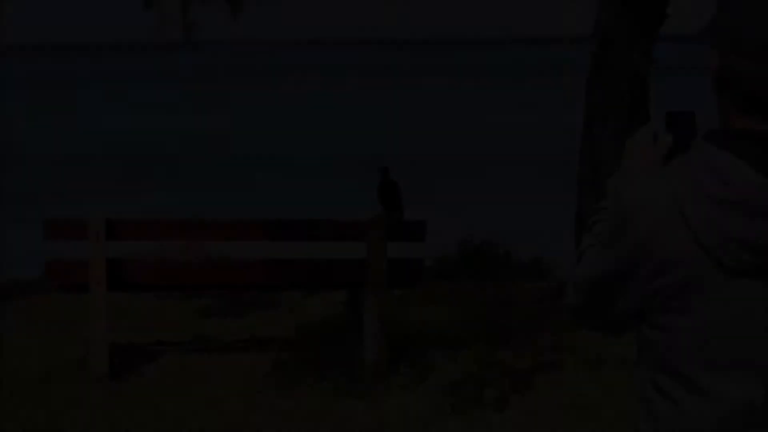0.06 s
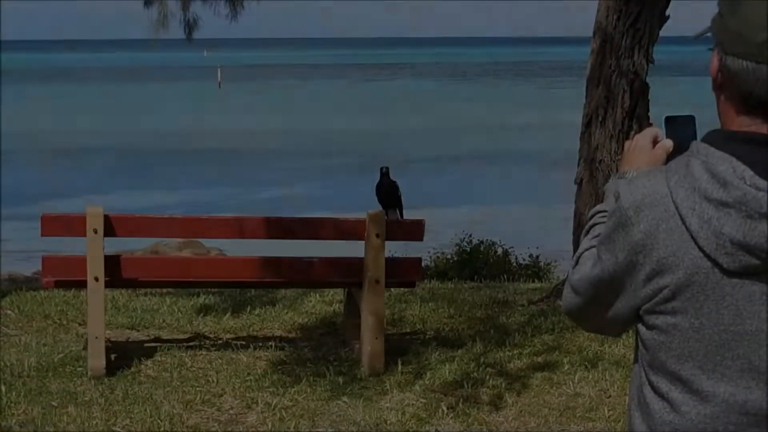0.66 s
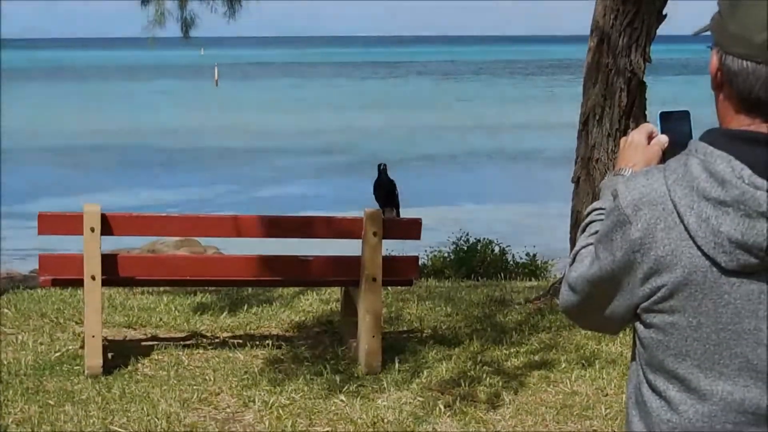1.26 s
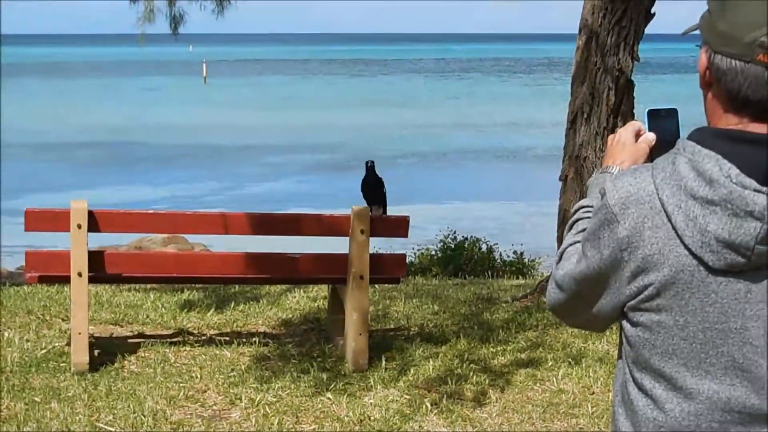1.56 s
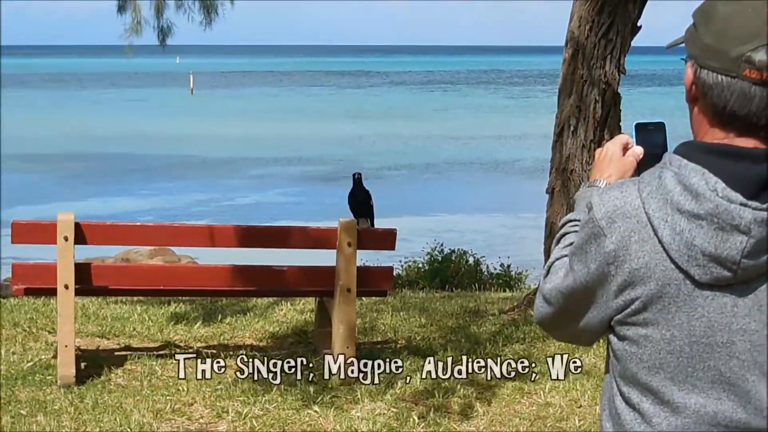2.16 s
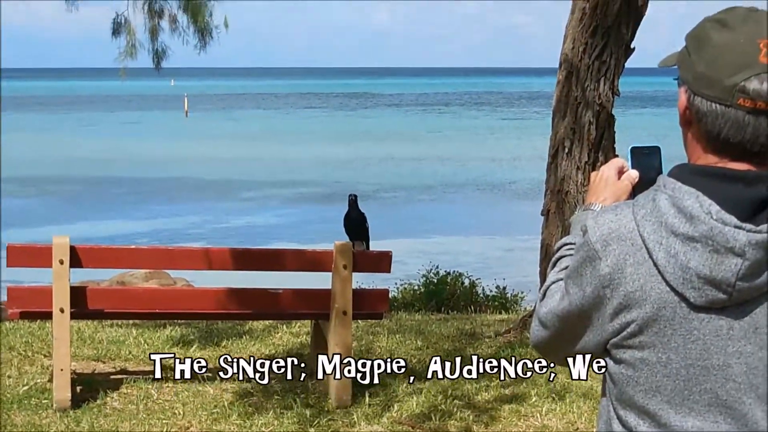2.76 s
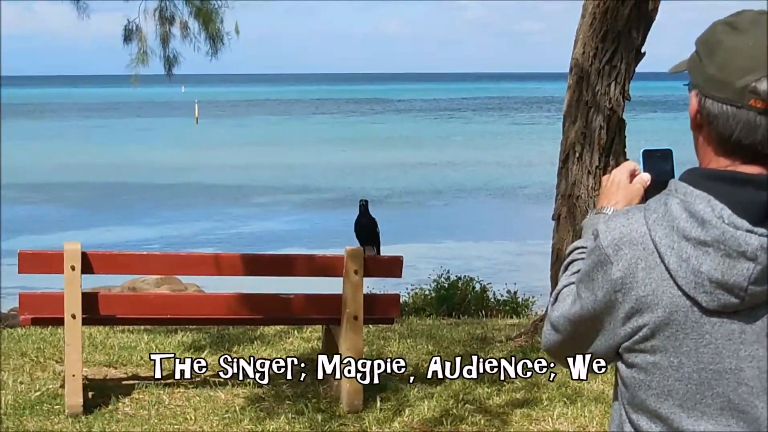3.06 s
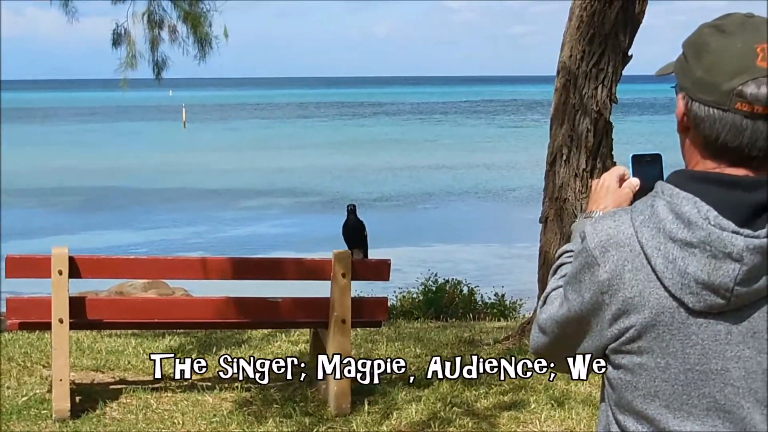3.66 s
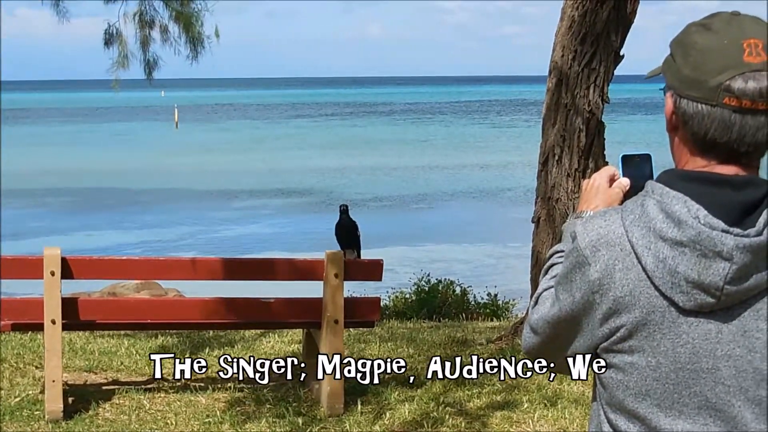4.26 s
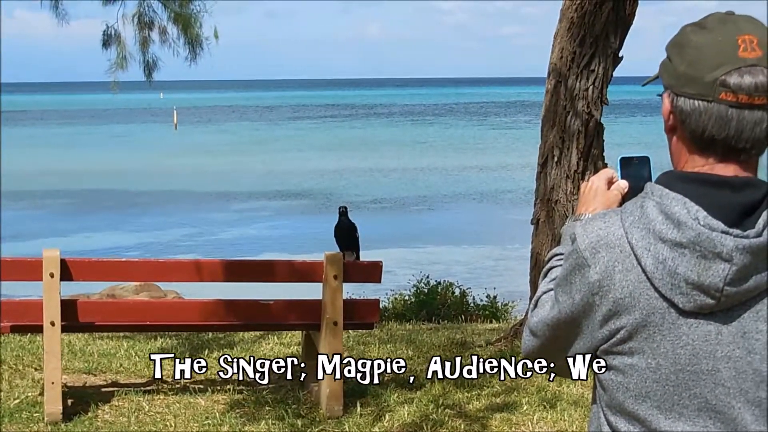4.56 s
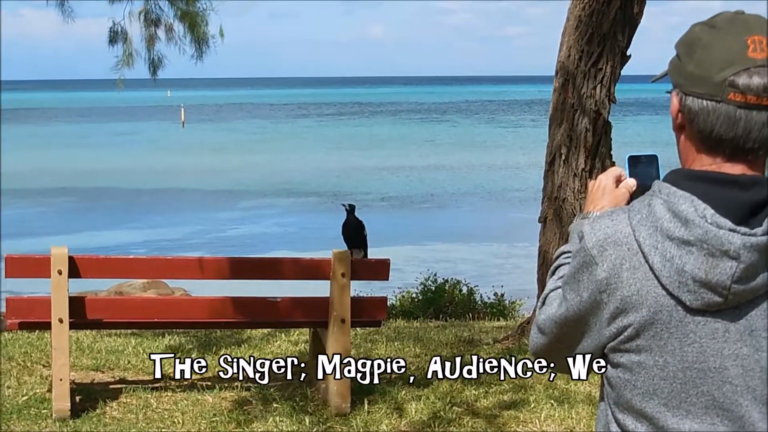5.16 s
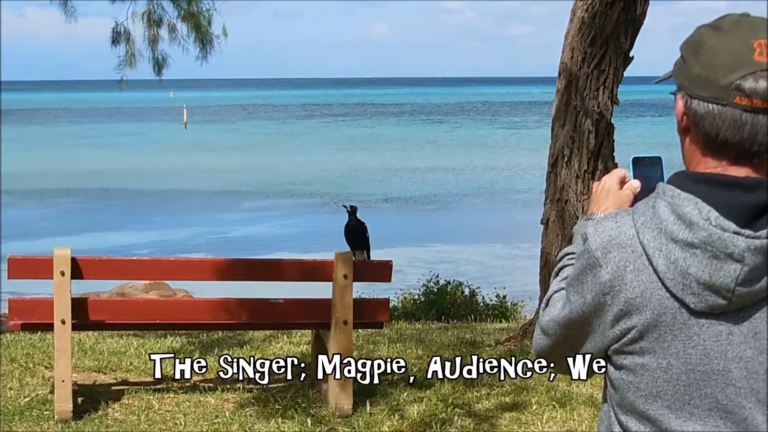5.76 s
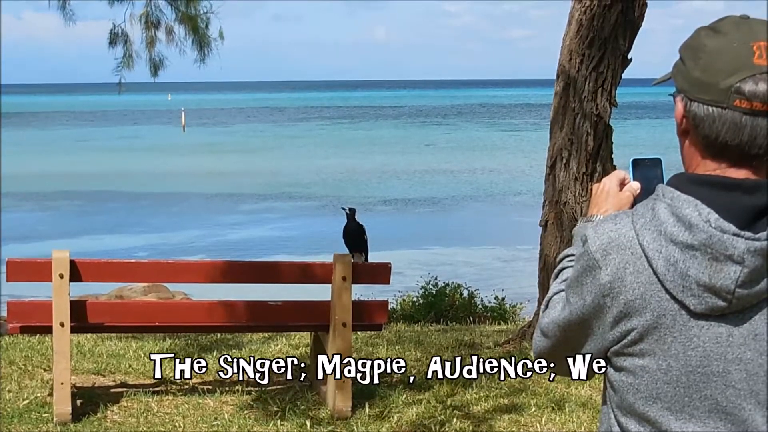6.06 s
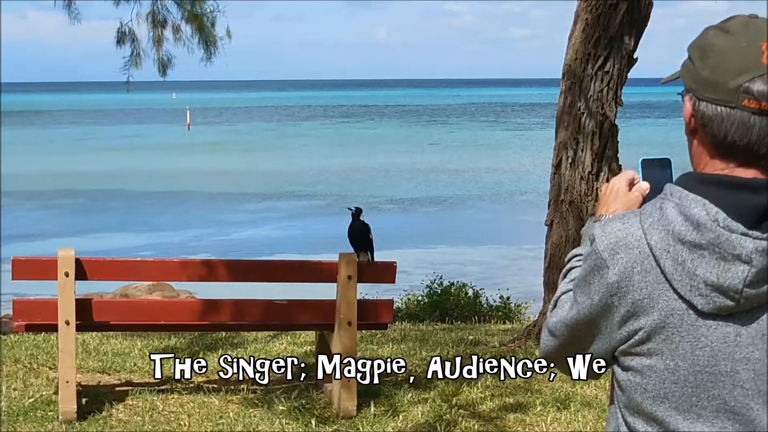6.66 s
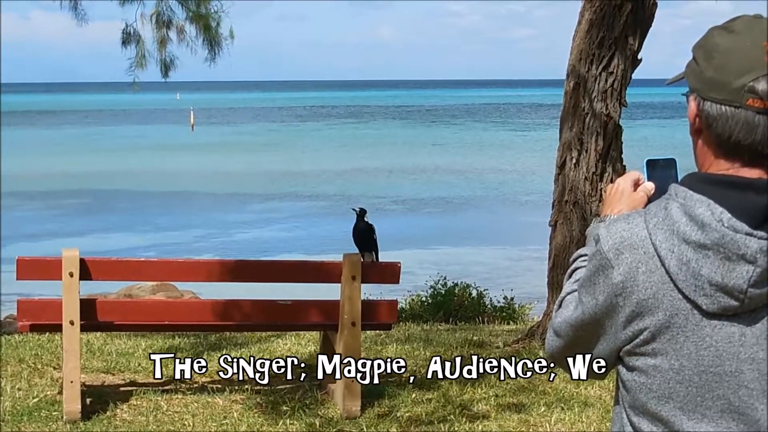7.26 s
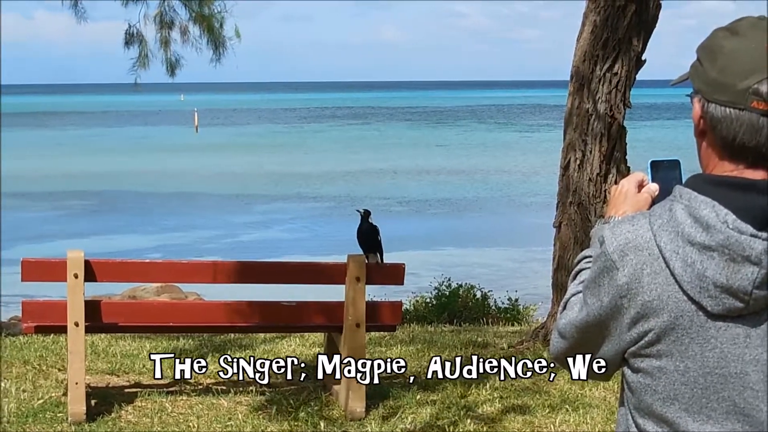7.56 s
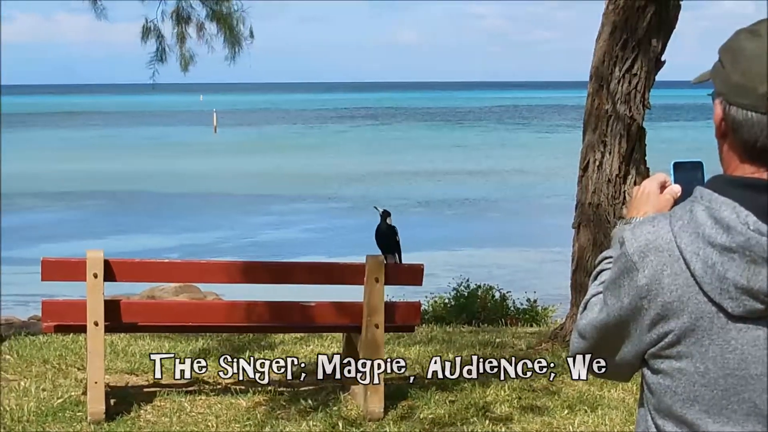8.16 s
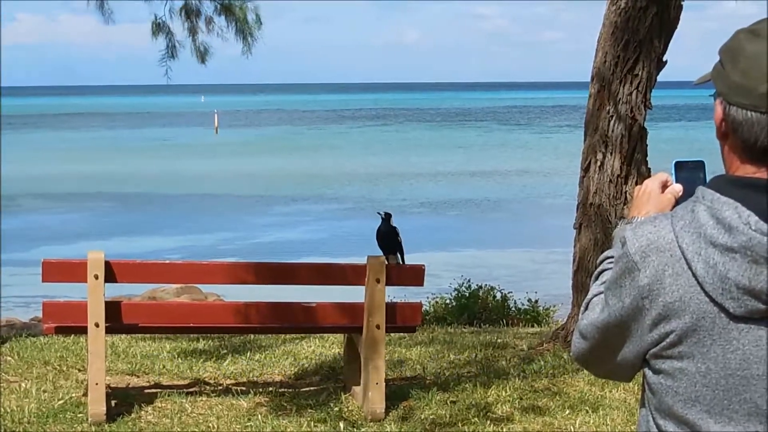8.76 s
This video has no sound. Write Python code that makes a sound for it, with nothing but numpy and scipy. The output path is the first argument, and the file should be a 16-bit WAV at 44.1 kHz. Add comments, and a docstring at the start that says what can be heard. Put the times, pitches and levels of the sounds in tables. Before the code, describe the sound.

A magpie sings warbles, falling whistles, squeaks and hisses over gently washing waves, while wind gusts thump on the microphone.

```python
"""You hear a magpie singing by a calm sea, fading in: falling whistles and warbles, then squeaks,
hisses and bill clicks. Its voice box (the syrinx) has two sides: one alone whistles, and both together
beat against each other and warble. Small waves wash and splash behind it, gusts of wind thump on the
microphone, and near the end a thin call comes from farther off."""
import sys
import numpy as np
from scipy import signal
from scipy.fft import rfft, irfft, next_fast_len
from scipy.io import wavfile

SR = 44100
rng = np.random.default_rng(int(sys.argv[2]) if len(sys.argv) > 2 else 0)


def waveform_to_disk(signal):
    """Save audio, clipped to [-1, 1], as 16-bit WAV at the path in sys.argv[1]."""
    frames = np.transpose(np.atleast_2d(signal))
    scaled = np.clip(frames, -1, 1) * 32767
    samples = np.round(scaled).astype(np.int16)
    wavfile.write(sys.argv[1], SR, samples)


N = 387971
TIME = np.arange(N) / SR
CUTOFF_HZ = 15900

# how alike the water sounds in both ears: f/Hz, likeness (1 same, 0 unrelated, -1 opposite)
WATER_LIKENESS = [(300, 0.79), (700, 0.88), (1400, 0.52), (2500, -0.11), (4400, -0.32), (7000, 0.017)]


def from_db(db):
    return 10 ** (np.asarray(db) / 20)


def rms_one(x):
    """Scale a sound to an average strength (rms) of 1."""
    return x / np.sqrt(np.mean(x ** 2) + 1e-20)


def pan(left_db):
    """Left and right gains, with the left louder by left_db."""
    return from_db(np.array([[left_db], [-left_db]]) / 2)


def in_time(rows, t=TIME):
    """The columns of a curve at times t."""
    s, *columns = np.transpose(rows)
    return [np.interp(t, s, c) for c in columns]


def at_hz(points, hz):
    """A curve's value at hz, with octaves evenly spaced."""
    point_hz, values = np.transpose(points)
    return np.interp(np.log(hz), np.log(point_hz), values)


def filtered(x, order, hz, kind="low"):
    """Keep the sound below hz, or within a band; a higher order cuts more sharply."""
    return signal.sosfilt(signal.butter(order, hz, kind, fs=SR, output="sos"), x)


def drift(rate):
    """A random wander of size about 1 that changes rate times a second."""
    knots = rng.standard_normal(int(N / SR * rate) + 3)
    return rms_one(np.interp(TIME * rate, np.arange(len(knots)), knots))


def swell(s, half_s):
    """A rounded rise and fall of height 1 around time s."""
    return 1 / np.cosh(np.clip((TIME - s) / half_s, -30, 30))


def turn(hz):
    """The phase of a vibration: how far it has turned so far."""
    return 2 * np.pi * np.cumsum(hz) / SR


# A note is one glide under one swell. Its columns are: t/s, length/s, from/Hz, to/Hz,
# bow/Hz (bend at mid-glide), level/dB, crest (where it is loudest: 0 start, 1 end).
def notes(table, ends_db, roundness=0.79, edge_s=0.0021):
    """Each note's samples, pitch, gain and extra columns; the swell is ends_db at both ends."""
    for start, length, from_hz, to_hz, bow_hz, peak_db, crest, *extra in table:
        span = slice(int(start * SR), min(int((start + length) * SR), N))
        along = np.linspace(0, 1, span.stop - span.start)
        hz = from_hz + (to_hz - from_hz) * along + bow_hz * 4 * along * (1 - along)
        crest = np.clip(crest, .05, .95)
        off_crest = np.maximum((crest - along) / crest, (along - crest) / (1 - crest))
        gate = np.sin(np.pi / 2 * np.clip(np.minimum(along, 1 - along) * length / edge_s, 0, 1))
        yield span, hz, gate * from_db(peak_db + ends_db * off_crest ** roundness), extra


def noise(spectrum, likeness, patchy_db, patch_rate):
    """Stereo noise of strength near 1, in third-octave bands that each flicker on their own."""
    low, high = spectrum[0][0], min(spectrum[-1][0] * 1.1, .45 * SR)
    edges = np.geomspace(low, high, int(3 * np.log2(high / low)) + 2)
    white = rng.standard_normal((2, 2, N))
    out, power = 0, 0
    for k, band in enumerate(zip(edges, edges[1:])):
        mid, side = filtered(white[k % 2], 2, band, "band")
        hz = np.sqrt(band[0] * band[1])
        alike = at_hz(likeness, hz)
        stereo = np.sqrt(1 + alike) * mid + np.sqrt(1 - alike) * side * [[1], [-1]]
        gain = from_db(at_hz(spectrum, hz))
        power += gain ** 2 * 2 * np.var(mid)
        out += gain * from_db(patchy_db * drift(patch_rate)) * stereo
    return out / np.sqrt(power)


def squeal(hz, half_width_hz):
    """Narrow noise of strength 1 around a moving pitch."""
    eddies = rms_one(filtered(rng.standard_normal((2, N)), 2, half_width_hz))[:, :len(hz)]
    return eddies[0] * np.cos(turn(hz)) + eddies[1] * np.sin(turn(hz))


def sea(foam_db=0.92):
    """Small waves wash over the shallows and their foam fizzes."""
    # the rise and fall of the wash: t/s, level/dB
    shore = [(1.7, -58.5), (3.5, -54), (5.5, -52.5), (7.1, -49.5), (8.8, -52)]
    # the tone of the water and of its foam: f/Hz, level/dB
    wash_spectrum = [(100, -4), (250, -4), (450, -4.5), (720, 1), (900, 0), (1200, 0.5), (1650, -16.5),
                     (2400, -20)]
    foam_spectrum = [(1500, -0.5), (2500, 0.5), (5500, -4), (10000, -7.5), (15500, -10)]
    wash_db, = in_time(shore)
    wash = noise(wash_spectrum, WATER_LIKENESS, patchy_db=2.5, patch_rate=16)
    foam = noise(foam_spectrum, WATER_LIKENESS, patchy_db=1.32, patch_rate=25)
    return from_db(wash_db) * (wash + from_db(foam_db) * foam)


def wind(flutter_db=-9, firm_gust_db=-38, flutter_steepness=1.75):
    """Breeze and gusts rumble on the microphone; hard gusts add a flutter, most on the windward left."""
    # gusts: t/s, level/dB, half length/s
    buffets = [(1.199, -38.5, 0.02), (1.297, -41.5, 0.046), (1.398, -45, 0.032), (2.854, -49, .025),
               (2.978, -49, .035), (3.121, -46, 0.047), (3.237, -38, 0.036), (3.34, -42, 0.025),
               (4.53, -41, 0.028), (4.68, -34, 0.016), (4.749, -37, 0.029), (4.82, -34, .022),
               (4.913, -39.5, 0.026), (5.14, -31, 0.034), (5.229, -32.5, 0.025), (5.334, -35.5, 0.032),
               (5.453, -36.5, .022), (5.557, -39, 0.038), (7.7, -41, 0.016), (7.905, -38.5, 0.02),
               (8.765, -43, 0.047)]
    # the light breeze between them: t/s, level/dB
    breeze = [(2.4, -63.5), (5.5, -46.5), (6.5, -67.5), (7.6, -56)]
    # the tone of the low rumble and the higher flutter: f/Hz, level/dB
    rumble_spectrum = [(22, 4), (45, -0.5), (80, -3), (120, -15.5), (170, -35)]
    flutter_spectrum = [(100, 9.5), (170, 4.5), (250, -10), (400, -14.5), (900, -29)]
    # how alike the wind is in both ears: f/Hz, likeness
    likeness = [(30, .42), (300, .3)]
    gusts = np.sqrt(sum((from_db(db) * swell(s, half_s)) ** 2 for s, db, half_s in buffets))
    breeze_db, = in_time(breeze)
    lumps_db = 3.2 * drift(40)
    rumble_gain = np.hypot(gusts, from_db(breeze_db)) * from_db(lumps_db / 2)
    hardness = gusts / from_db(firm_gust_db)
    flutter_gain = from_db(firm_gust_db + flutter_db + lumps_db) * hardness ** flutter_steepness
    rumble = rumble_gain * noise(rumble_spectrum, likeness, patchy_db=3.5, patch_rate=14)
    flutter = flutter_gain * noise(flutter_spectrum, likeness, patchy_db=2.0, patch_rate=28)
    return pan(left_db=3) * rumble + pan(left_db=6) * flutter


def warbles(jitter=.035, shimmer_db=2, count=4):
    """Both sides of the voice box sing and beat; rough notes waver more and add tones above the pair."""
    # two-sided notes: the note columns, beat/Hz, second side against first/dB, roughness
    two_sided_notes = [ (.755, 0.05, 2880, 1720, -150, -53, 0.3, 224, -9, 1.1),
                       (.828, 0.079, 1645, 1516, 13, -46, 0.7, 108, -2, 0.07),
                       (.965, 0.095, 2330, 1700, -80.5, -64, 0.24, 140, 13, 0.75),
                       (1.15, 0.097, 1350, 1190, -41, -49, 0.4, 86, -10, 0.57),
                       (1.305, 0.043, 890, 800, -21, -42.5, 0.2, 111, -7, 0.7),
                       (1.708, 0.116, 811, 686.5, -62.5, -41.5, 0.6, 106.6, -12.5, 0.62),
                       (2.92, 0.12, 1102, 998, 1, -43, 0.2, 171, -9, 0.2)]
    out = np.zeros(N)
    waver, beat_waver = jitter * drift(300), jitter * drift(300)
    first_gain, second_gain = from_db(shimmer_db * drift(70)), from_db(shimmer_db * drift(70))
    for span, hz, gain, extra in notes(two_sided_notes, ends_db=-17, roundness=2.7, edge_s=0.012):
        beat_hz, second_db, rough = extra
        phase = turn(hz * (1 + rough * waver[span]))
        beat = turn(beat_hz + hz * rough * beat_waver[span] / 2)
        first = first_gain[span] * np.sin(phase)
        second = second_gain[span] * np.sin(phase - beat)
        above = sum(rough ** k / k * np.sin(phase + k * beat) for k in range(1, count + 1))
        out[span] += np.sqrt(2) * gain * (first + from_db(second_db) * (second + above))
    return out


def whistles(jitter=0.01, shimmer_db=2.0, second_db=-38, third_db=-34):
    """One side of the voice box sings an almost pure tone."""
    # clear notes: the note columns
    clear_notes = [ (.80, 0.043, 1690, 1530, -18, -36, 0.3), (.888, 0.097, 1537, 1220, 23, -38, 0),
                   (1.29, 0.034, 988, 842, -3.5, -35, 0.56), (1.425, 0.059, 1590, 1415, -99, -47, 0.28),
                   (1.515, 0.045, 1187, 1130, 0, -46, 0.2), (1.525, 0.079, 832, 818, -7, -47.5, 0.2),
                   (1.596, 0.036, 890, 817, -31, -34.5, 0.03), (1.855, 0.034, 1130, 1085, -1, -46, 0.54),
                   (1.882, 0.019, 855, 736, -2, -45.5, 0.36), (1.92, 0.088, 1078, 1003, -3, -44, 0.5),
                   (2.012, 0.09, 1042, 980, 20, -50.5, 0.36), (2.73, 0.15, 905, 722, 21, -44, 0.6),
                   (3.344, 0.029, 850, 716, -25, -39.5, 0.3), (5.815, 0.049, 1253, 1506, 71, -37.5, 0.76),
                   (5.85, 0.071, 1395, 1433, 34, -32, 0.68), (5.965, 0.044, 1367, 1204, 0, -31, 0.65),
                   (6.005, 0.083, 1000, 893, -29, -43, 0.44), (6.158, 0.045, 1265, 1310, 96, -29, 0.6),
                   (6.198, 0.051, 1004, 1138, 170, -33.5, 0.67), (6.63, 0.058, 609, 650, 113, -36.5, 0.45),
                   (6.9, 0.025, 820, 910, 2, -40.5, 0.5), (6.924, 0.032, 970, 607, 16, -35.5, 0.9),
                   (6.948, 0.021, 877, 910, 4, -37, 0.6), (6.977, 0.022, 730, 776, 5, -37.5, 1)]
    out = np.zeros(N)
    waver, shimmer = 1 + jitter * drift(200), shimmer_db * drift(150)
    for span, hz, gain, _ in notes(clear_notes + stutter(), ends_db=-10):
        phase = turn(hz * waver[span])
        overtones = from_db(second_db) * np.sin(2 * phase) + from_db(third_db) * np.sin(3 * phase)
        out[span] += np.sqrt(2) * gain * from_db(shimmer[span]) * (np.sin(phase) + overtones)
    return out


def rasp(song, low_hz=950, rasp_db=-19, half_width_hz=170, upper_ratio=1.627, upper_db=-4):
    """Low, wide swings slap the voice box's membranes together: a buzz, and two windpipe rings."""
    # the tone of the buzz: f/Hz, level/dB
    buzz_spectrum = [(1200, 0.5), (1600, -6.5), (2300, -11.5), (3600, -15), (4600, -9.5), (6300, -34),
                     (12200, -24)]
    # the windpipe's gliding lower ring: t/s, f/Hz, level against the low notes/dB
    windpipe = [(2.15, 5570, -40), (2.25, 5000, -28.5), (2.37, 4660, -36), (3.02, 5030, -29),
                (3.1, 4860, -26), (3.16, 4300, -38)]
    size = next_fast_len(N)
    swing = signal.hilbert(filtered(song, 6, low_hz), size)[:N]  # strength and phase of the low notes
    phase = np.angle(swing) + .25 * drift(900)  # uneven slaps blur the high overtones
    buzz = np.abs(swing) * sum(np.cos(k * phase) for k in range(2, 16))
    colour = from_db(at_hz(buzz_spectrum, np.arange(size // 2 + 1) * SR / size + 1))
    buzz = irfft(rfft(buzz, size) * colour, size)[:N]
    hz, ring_db = in_time(windpipe)
    ring = squeal(hz, half_width_hz) + from_db(upper_db) * squeal(upper_ratio * hz, half_width_hz)
    return from_db(rasp_db) * buzz + from_db(ring_db) * np.abs(swing) * ring


def surroundings(x, scatter_db=-22, tail_s=0.72, dull_hz=5000, echo_s=0.055, echo_db=-16):
    """Trunk, bench and ground scatter a faint stereo tail; something farther off sends one dull echo."""
    t = TIME[:SR // 2]
    tail = rng.standard_normal((2, len(t))) * from_db(-60 * t / tail_s) * (t > .005)
    tail /= np.sqrt(np.sum(tail ** 2) / 2)
    echo = filtered(signal.unit_impulse(len(t), int(echo_s * SR)), 2, 1800)
    echoes = filtered(from_db(scatter_db) * tail + from_db(echo_db) * echo, 1, dull_hz)
    return signal.fftconvolve(x[None], echoes, axes=1)[:, :N]


def carols(flick=0.2, unsteady=0.234, shimmer_db=1.5, overtone_db=-16):
    """The two sides of the voice box pull on each other, so the pitch swings up and down in each beat."""
    # three long falling notes, each a curve:
    # t/s, f/Hz, level/dB, beat/Hz, second side against first/dB, pitch swing/Hz
    curves = [
        [(2.1, 1005, -56.5, 115.1, 4, 16), (2.2, 872, -36.5, 114.4, -2, 36), (2.295, 746, -36.5, 96.3, -3, 34),
         (2.372, 667, -42, 94, -23, 46), (2.395, 674, -53, 95, -15, 40)],
        [(2.505, 1420, -57, 64.4, -30, 3), (2.585, 1345, -40.5, 65, -25, 6), (2.65, 1326, -38.5, 66.8, -13, 22),
         (2.725, 1250, -33, 70.2, -19, 21), (2.8, 1130, -43.5, 80.3, -13, 65), (2.91, 1045, -54, 85, -16, 70)],
        [(3.02, 1030, -42, 88.2, -9, 70), (3.06, 924, -40.5, 89, 0, 96), (3.1, 903, -32, 79.5, -9, 65.5),
         (3.14, 754, -36.5, 68.9, -13, 110.6), (3.21, 677, -37.5, 69.7, -21, 70),
         (3.29, 633, -52, 71.5, -7, 45)],
    ]
    out = np.zeros(N)
    for curve in curves:
        span = slice(int(curve[0][0] * SR), int(curve[-1][0] * SR))
        hz, db, beat_hz, second_db, swing_hz = in_time(curve, TIME[span])
        waver, stumble, shimmer = (drift(250)[span] for _ in range(3))
        beat = turn(beat_hz + unsteady * swing_hz * stumble)  # wide swings are less steady
        phase = turn(hz + swing_hz * (np.sin(beat) - flick * np.cos(2 * beat) + unsteady * waver))
        second_gain = from_db(second_db)
        reedy_side = np.sin(phase - beat) + from_db(overtone_db) * np.sin(2 * (phase - beat))
        pair = (np.sin(phase) + second_gain * reedy_side) / np.hypot(1, second_gain)
        soft_ends = signal.windows.tukey(len(hz), .05)
        out[span] += np.sqrt(2) * from_db(db + shimmer_db * shimmer) * pair * soft_ends
    return out


def clicks(decay_s=0.0082, band_ratio=1.05, level_db=-6):
    """Each click is a short burst of noise that dies away around its own pitch."""
    # bill snaps and small dry clicks: t/s, level/dB, f/Hz
    snaps = [(3.6012, -45.5, 7850), (3.697, -31.5, 3500), (6.1587, -36.5, 2450), (6.565, -41.5, 3970),
             (6.586, -40.5, 6640), (6.6287, -42, 2070), (7.1404, -40.5, 7360)]
    out, t = np.zeros(N), TIME[:SR // 20]
    for s, db, hz in snaps:
        burst = rms_one(filtered(rng.standard_normal(len(t)), 1, [hz / band_ratio, hz * band_ratio], "band"))
        start = int(s * SR)
        out[start:start + len(t)] += from_db(db + level_db) * burst * np.exp(-t / decay_s)
    return out


def squeaks(jitter=.025, shimmer_db=1.3, slope_db=-6.0, count=5):
    """Fast, reedy glides whose overtones are shaped by the throat."""
    # squeaks: the note columns
    reedy_notes = [ (3.688, 0.025, 1686, 2260, 62, -41.5, 0.65), (3.706, 0.03, 2490, 2850, 152, -34, 0.48),
                   (4.025, 0.038, 1646, 1340, -40, -43.5, 0.66),
                   (4.078, 0.028, 1570, 2320, -220, -50, 0.75), (4.11, 0.034, 1690, 1440, 10, -54, 0.45),
                   (4.19, 0.064, 2505, 2200, -250, -47, 0.7), (4.256, 0.034, 1924, 1480, -47, -43, 0.66),
                   (4.378, 0.028, 2570, 3000, 0, -44.5, 0.8), (4.86, 0.18, 4130, 4010, -0.5, -50.5, 0.7),
                   (5.098, 0.018, 1170, 1910, 3, -41, 1), (5.116, 0.039, 1856, 1320, -87, -41, 0.5),
                   (5.225, 0.056, 4030, 3970, -3, -47, 0.5), (5.298, 0.057, 2500, 3130, -5, -54, 0.3),
                   (5.598, 0.068, 3500, 3450, 42, -45.5, 0.68), (8.436, .05, 4230, 4200, 202, -52, 0.2)]
    # how the throat boosts or weakens each tone: f/Hz, gain/dB
    throat = [(1300, -5.5), (3000, 0.5), (4100, 4), (5000, -14.5)]
    out = np.zeros(N)
    waver, shimmer = 1 + jitter * drift(900), shimmer_db * drift(300)
    k = np.arange(1, count + 1)[:, None]
    for span, hz, gain, _ in notes(reedy_notes, ends_db=-7):
        strengths = from_db(at_hz(throat, k * hz) + slope_db * (k - 1)) * (k * hz < CUTOFF_HZ)
        tone = np.sum(strengths * np.sin(k * turn(hz * waver[span])), axis=0)
        tone /= np.sqrt(np.sum(strengths ** 2, axis=0) / 2)
        out[span] += gain * from_db(-shimmer[span]) * tone
    return out


def splashes(spatter_db=2.5):
    """Little waves tip over on the shore, each in a short, wide spatter."""
    # splashes: t/s, level/dB, half length/s
    wavelets = [(3.905, -54.5, 0.0099), (6.99, -52, 0.043), (8.076, -56.5, 0.18), (8.747, -48.5, 0.014)]
    # their tone: f/Hz, level/dB
    spectrum = [(1400, -3.5), (2500, 2.5), (4000, -2), (11000, -16)]
    strength = sum(from_db(db) * swell(s, half_s) for s, db, half_s in wavelets)
    spatter = from_db(spatter_db * drift(250))
    return strength * spatter * noise(spectrum, WATER_LIKENESS, patchy_db=4.5, patch_rate=60)


def hisses(half_width_hz=600, flutter_db=0.63, level_db=-2.5):
    """Air rushes through the open bill, with a noisy squeal that glides as the bill moves."""
    # hisses: the note columns, squeal against air/dB
    breaths = [ (4.37, 0.18, 5440, 4930, 0, -42, 0.27, -9), (4.78, 0.24, 4330, 4210, 5, -43.5, 0.47, -9),
               (4.88, 0.09, 8300, 7500, 4, -46, 0.8, 28), (5.0, 0.062, 6050, 6300, -4, -42, 0.54, 8),
               (5.125, .12, 6740, 5380, 255, -37, 0.24, 16), (5.195, .17, 5090, 3590, -300, -46.5, 0.4, 2),
               (5.583, .177, 5450, 4940, -4.5, -45.5, 0.68, -11),
               (5.865, 0.23, 4750, 4290, -0.5, -42.5, 0.23, 3)]
    # the tone of the rushing air: f/Hz, level/dB
    spectrum = [(2500, -5), (3200, 5.5), (3900, 8.5), (6000, 5), (8300, -0.5), (10500, -16), (14000, -24)]
    # how alike it is in both ears: f/Hz, likeness
    likeness = [(5000, 0.44), (12000, 0.37)]
    air = noise(spectrum, likeness, patchy_db=3.0, patch_rate=50)
    out = np.zeros((2, N))
    for span, hz, gain, (squeal_db,) in notes(breaths, ends_db=-4.5, edge_s=0.018):
        share = from_db(squeal_db)
        out[:, span] += gain * (air[:, span] + share * squeal(hz, half_width_hz)) / np.hypot(1, share)
    return out * from_db(level_db + flutter_db * drift(200))


def slaps(band_hz=(160, 300), half_s=.016):
    """A tight swirl of wind flicks across the left side of the microphone."""
    # the hardest slaps of wind: t/s, level/dB
    hits = [(5.08, -25), (5.211, -29.5)]
    swirl = rms_one(filtered(rng.standard_normal(N), 3, band_hz, "band"))
    passing = sum(from_db(db) * np.exp(-((TIME - s) / half_s) ** 2) for s, db in hits)
    return passing * swirl * np.array([[1], [.1]])


def stutter(start_s=6.738, step_s=0.038, hz=668, db=-37, loss_db=1, crest=.42, count=5):
    """Note rows for one low whistle repeated back to back, weaker each time."""
    return [(start_s + k * step_s, step_s, hz, hz, 0, db - k * loss_db, crest) for k in range(count)]


def far_call(octave_db=-3, jitter=0.007):
    """A bird farther off sings two thin notes, each with a strong tone an octave up."""
    # the call: the note columns
    thin_notes = [(7.992, 0.033, 2570, 2580, 0, -50, 0.8), (8.04, 0.068, 2600, 2480, 0, -52, 0.2)]
    out, waver = np.zeros(N), 1 + jitter * drift(520)
    for span, hz, gain, _ in notes(thin_notes, ends_db=-11):
        phase = turn(hz * waver[span])
        out[span] += np.sqrt(2) * gain * (np.sin(phase) + from_db(octave_db) * np.sin(2 * phase))
    return out


def magpie():
    """All of the magpie's sounds, slightly to the left, with their echoes."""
    song = whistles() + warbles() + carols()
    voice = song + squeaks() + clicks()
    hiss = hisses()
    direct = pan(left_db=1.0) * (voice + rasp(song)) + pan(left_db=2.5) * hiss
    return direct + surroundings(voice + hiss.mean(axis=0))


def scene():
    """The birds in front of the sea, in the wind."""
    return magpie() + far_call() + sea() + splashes() + wind() + slaps()


def record(dry, fade_from_s=.05, fade_s=1.9):
    """The sound fades in, and the highest treble is cut off steeply."""
    faded = dry * np.clip((TIME - fade_from_s) / fade_s, from_db(-55), 1)
    return signal.sosfilt(signal.ellip(12, .1, 70, CUTOFF_HZ, fs=SR, output="sos"), faded)


dry = scene()
out = record(dry)
waveform_to_disk(out)
```